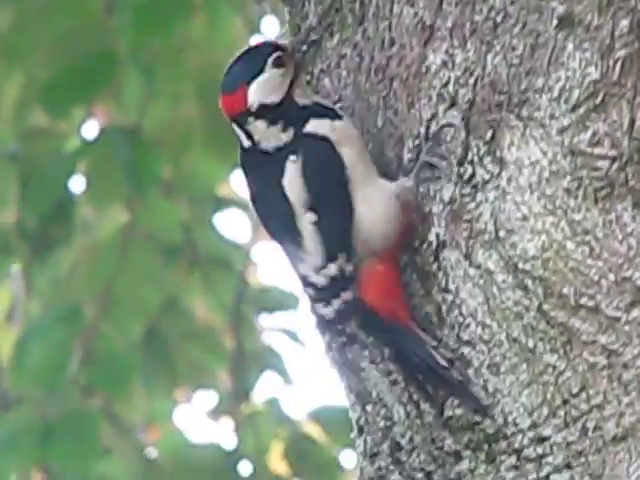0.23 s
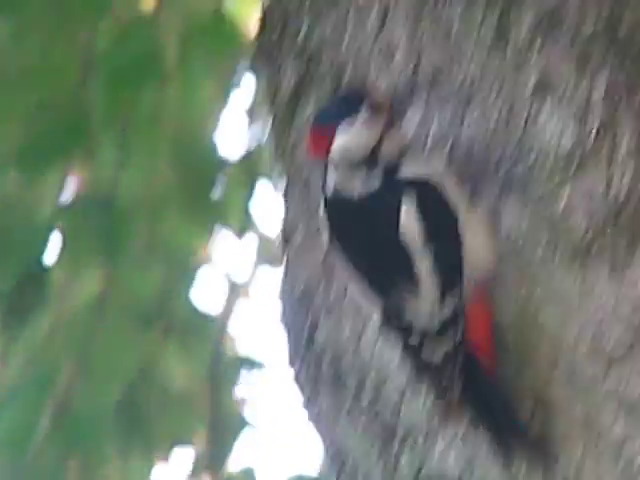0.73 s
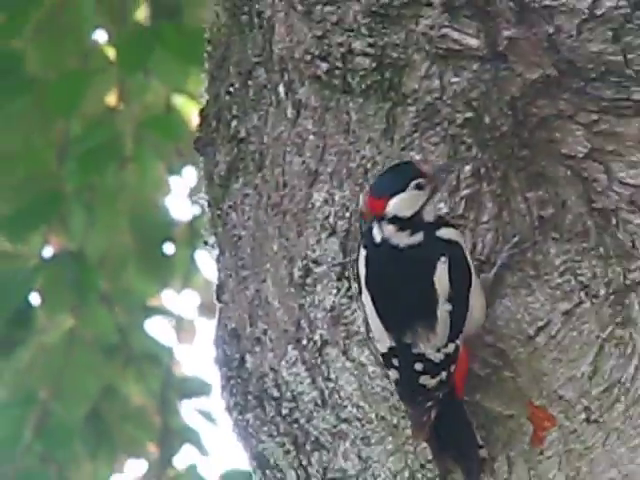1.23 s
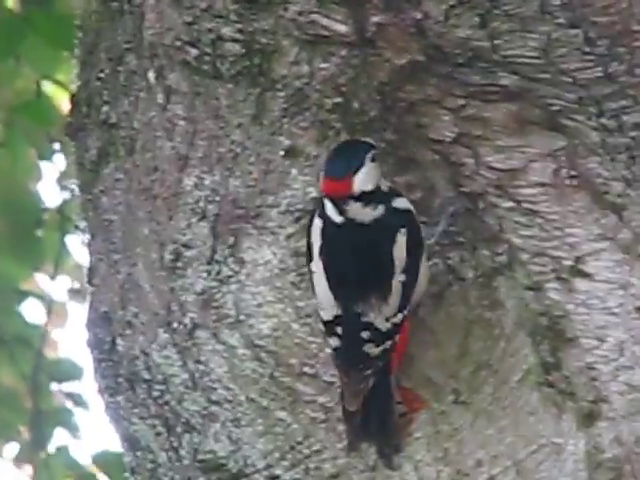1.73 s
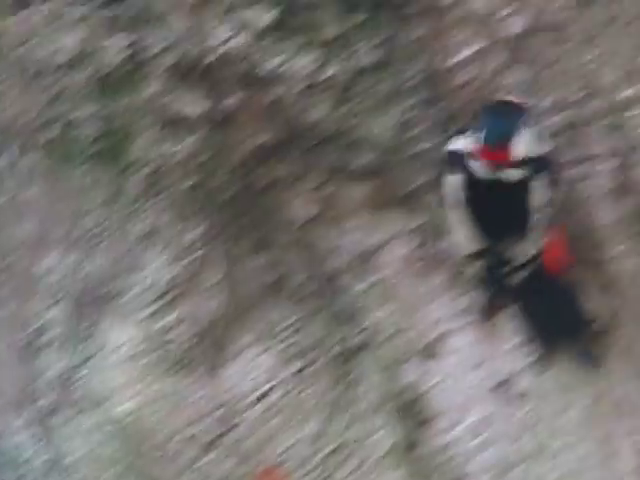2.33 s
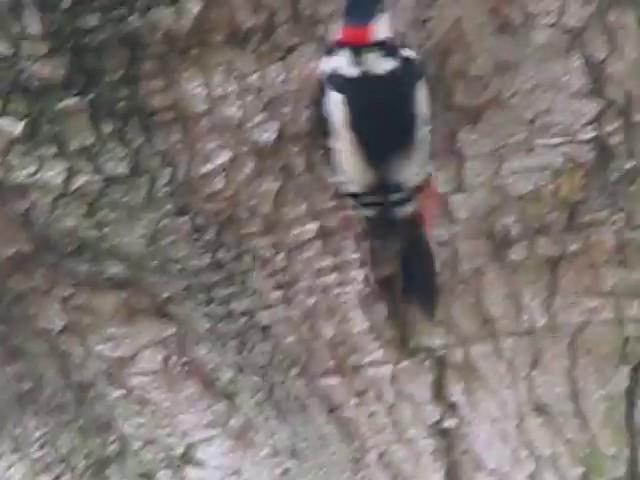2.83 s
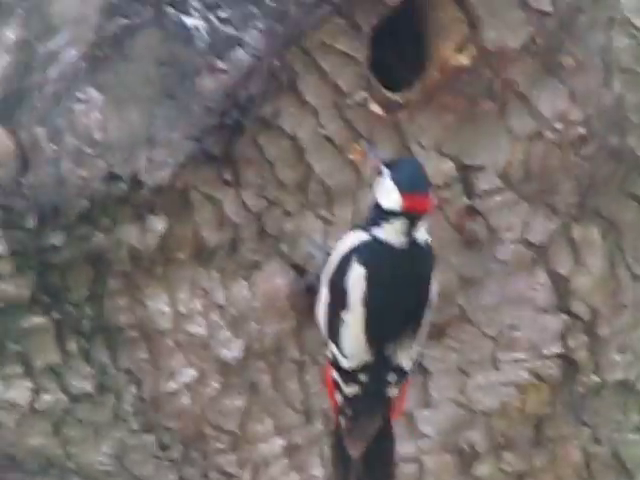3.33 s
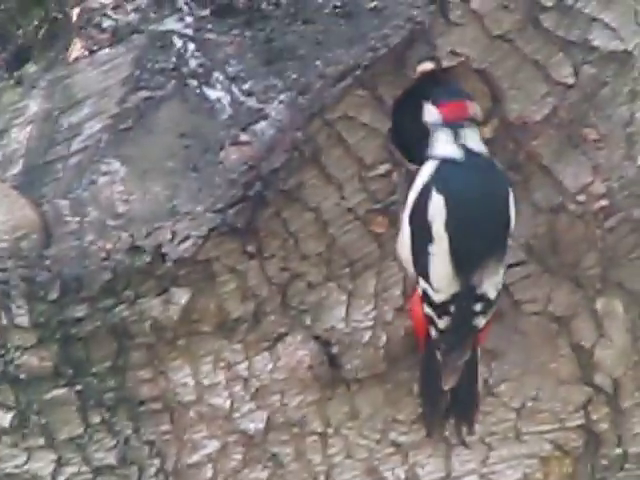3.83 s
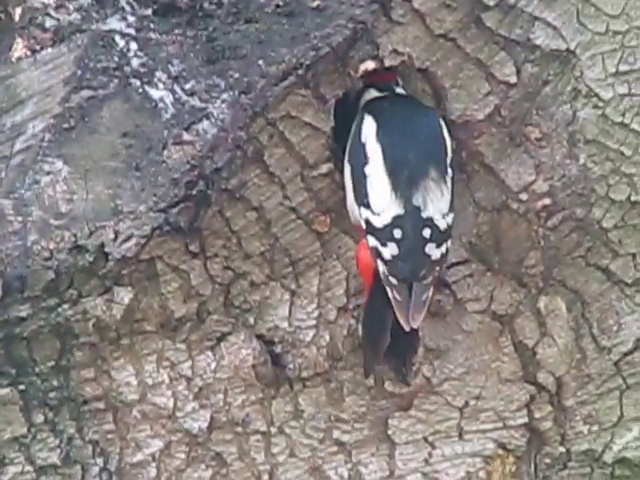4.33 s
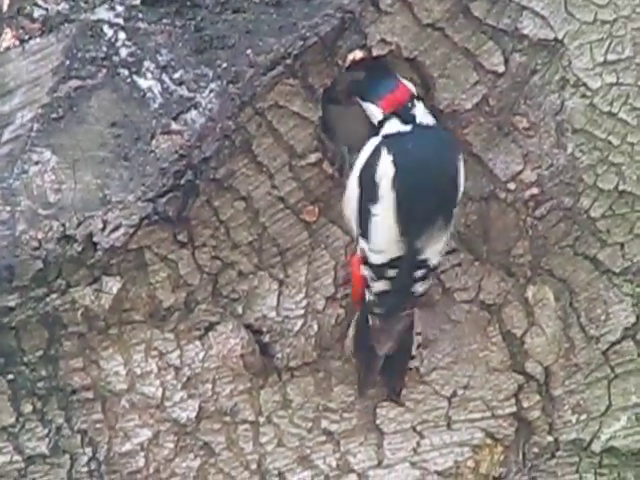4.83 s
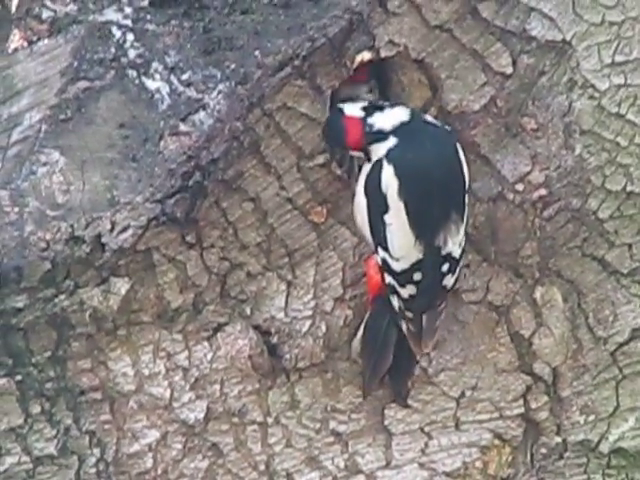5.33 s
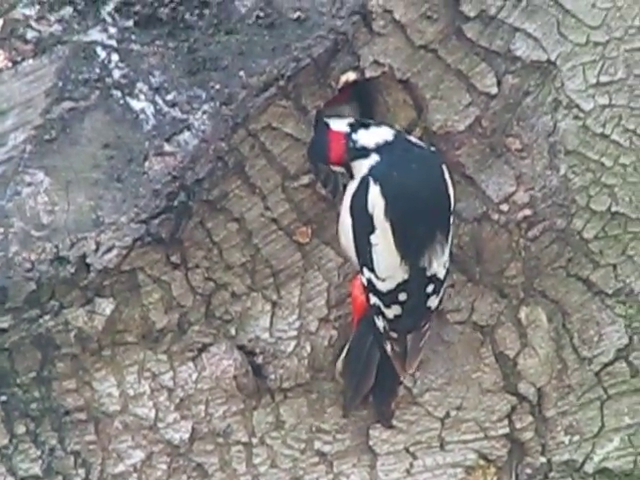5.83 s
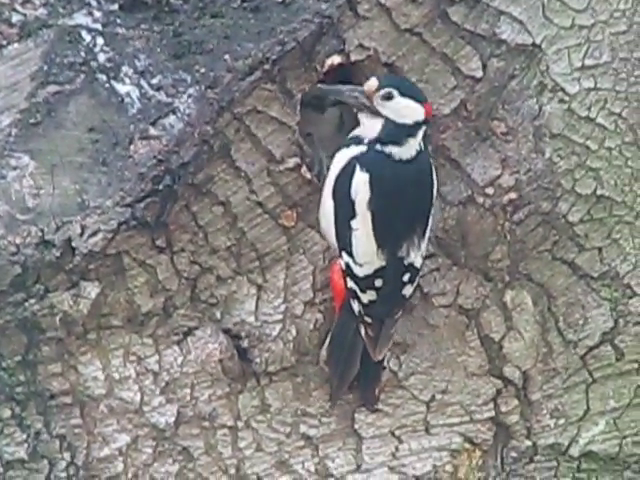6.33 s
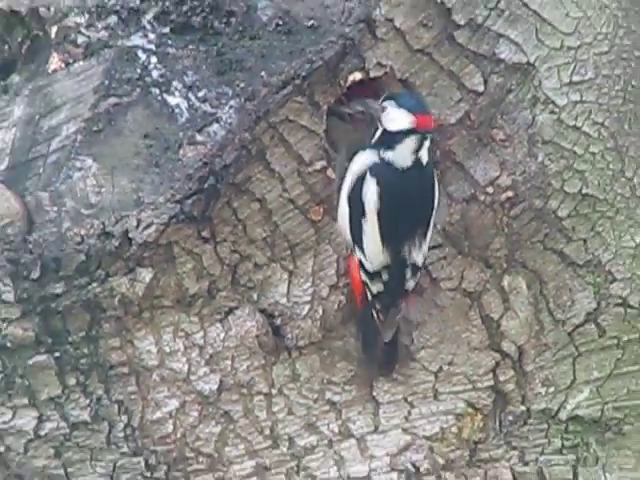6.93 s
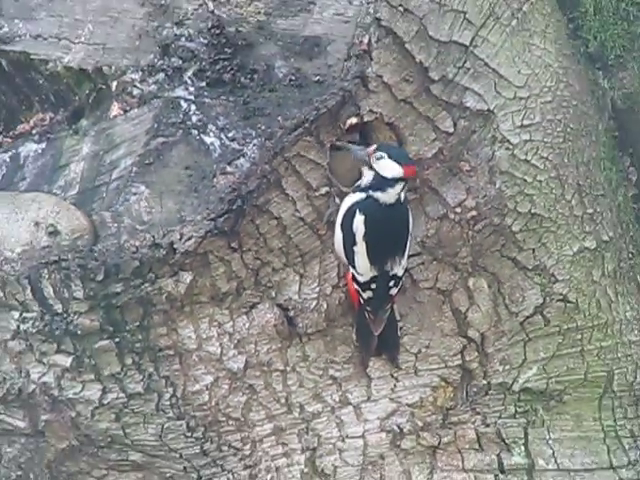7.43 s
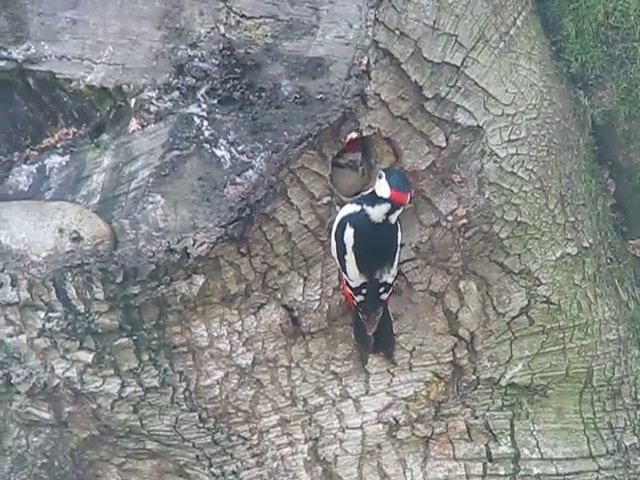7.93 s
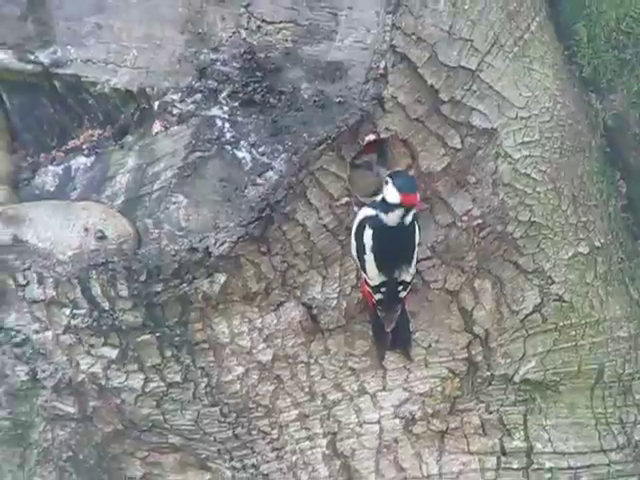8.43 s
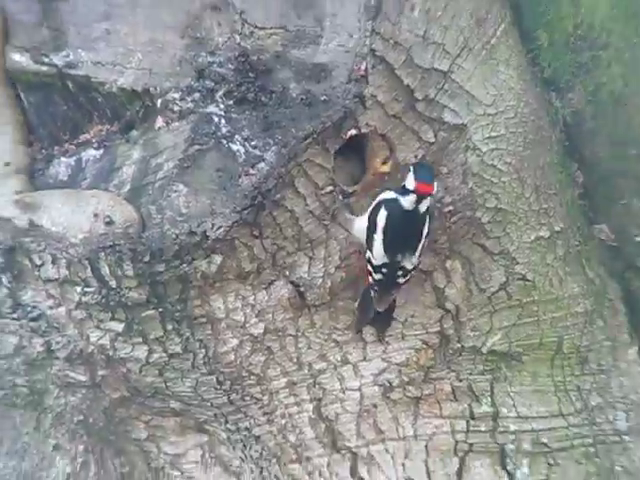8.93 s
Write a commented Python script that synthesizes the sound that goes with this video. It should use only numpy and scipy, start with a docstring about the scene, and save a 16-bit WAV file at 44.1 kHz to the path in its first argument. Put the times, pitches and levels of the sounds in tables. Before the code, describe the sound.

Outdoors among trees, soft wind and leaves lie over a faint wavering low hum. Far birds whistle first; then sharp, arched nestling calls repeat about six times a second, with one tiny tap and a distant dove. The calls slow slightly and peak, giving way to quiet chips and deeper, thinner peeping. The chatter returns, joined by a crisp knock and several softer wooden taps. The stereo microphone picks up the chicks prominently, with short echoes from bark and trunks.

```python
"""Wind rumble and leaf rustle (shaped noise), with a low drone (a wavering tone), run all the way through.
From the start small birds whistle far off (gliding pure tones), and a nestling in a tree hole begs in short
arched notes (stacked harmonics with rough ends). At 2 s come a distant dove and the first tap (crack and ring).
After 4 s short grainy noise puffs, a second nestling's peeps from deeper in the hole and, during feeding, weak
falling chips join in; the chatter returns near 6.8 s, and more taps and knocks follow from 7.8 s."""
import sys
import numpy as np
from scipy import signal
from scipy.fft import rfft, irfft, next_fast_len
from scipy.io import wavfile
from scipy.ndimage import uniform_filter1d

SR = 44100
rng = np.random.default_rng(int(sys.argv[2]) if len(sys.argv) > 2 else 0)


def dump(signal):
    """Clip the signal to [-1, 1] and save it as 16-bit WAV at the path in sys.argv[1]."""
    limited = np.clip(np.atleast_2d(signal).T, -1, 1)
    pcm = np.round(limited * 32767).astype(np.int16)
    wavfile.write(sys.argv[1], SR, pcm)


N = 404397  # length in samples


def gain_of(db):
    """Turns decibels into amplitude."""
    return 10 ** (np.asarray(db) / 20)


def evened(x):
    """Scales a sound to rms 1."""
    return x / np.sqrt(np.mean(x ** 2) + 1e-20)


def read(points, hz):
    """Reads a curve between its points; equal pitch steps are equal distances."""
    f, value = np.transpose(points)
    return np.interp(np.log(hz + 1), np.log(f + 1), value)


def add(mix, s, sound):
    """Mixes a sound in at s seconds."""
    part = mix[max(round(s * SR), 0):][:len(sound)]
    part += sound[:len(part)]


def band_noise(count, hz, width_hz):
    """Noise of rms 1 in a bell-shaped band; centred on 0 Hz it is a slow wander."""
    size = next_fast_len(count + 4096)
    bell = np.exp(-((np.fft.rfftfreq(size, 1 / SR) - hz) / width_hz) ** 2)
    noise = irfft(rfft(rng.standard_normal(size)) * bell, size)
    return evened(noise)[:count]


# balance of low and high in wind and leaves: [f/Hz, relative level/dB]
AIR_COLOUR = [(12, -36), (20, -5), (44, -0.5), (64, -2), (119, -5), (175, -7.5), (491, -17.5), (549, -17.5),
              (1450, -18), (1670, -17), (2400, -24.5), (2610, -23), (6020, -30), (7950, -34),
              (15500, -44.5)]
# the breeze; only its changes about the average count: [t/s, wind rumble level/dB, leaf rustle level/dB]
BREEZE_LEVELS = [(0, -46.5, -44.5), (.7, -45.5, -46.5), (1.2, -47.5, -45), (1.75, -49.5, -44.5),
                 (2.5, -50, -45), (3, -48.5, -46.5), (4.6, -49, -45.5), (5.5, -49, -45.5),
                 (6.3, -50, -45.5), (7.2, -53.5, -45), (8, -52.5, -44), (9.17, -54.5, -42.5)]
# how alike the air sounds at left and right: [f/Hz, likeness 0-1]
AIR_LIKENESS = [(30, 0.94), (120, 1), (250, .94), (500, 0.92), (1000, 0.62), (2000, 0.41), (5000, 0.033),
                (15000, 0.082)]
AIR_DB = -41  # overall rms


def air(patchy_db=0.82):
    """Wind rumble below and leaves above are noise that follows the breeze, in drifting patches."""
    frames, hz = N // 512 + 5, np.fft.rfftfreq(2048, 1 / SR)
    a, b, c, d, patches = rng.standard_normal((5, len(hz), frames))
    patches = uniform_filter1d(patches, size=16, axis=0)
    patches = evened(uniform_filter1d(patches, size=10, axis=1))

    t = np.arange(frames) * 512 / SR
    s, *levels = np.transpose(BREEZE_LEVELS)
    rumble_db, rustle_db = (np.interp(t, s, level - level.mean()) for level in levels)
    low = (1 / (1 + (hz / 500) ** 2))[:, None]
    gusty = low * (1 - np.exp(-(hz / 70) ** 2))[:, None]  # the deepest rumble does not follow the breeze

    same = np.clip(read(AIR_LIKENESS, hz), -1, 1)[:, None]
    left = a + 1j * b
    right = same * left + np.sqrt(1 - same ** 2) * (c + 1j * d)
    breeze_db = gusty * rumble_db + (1 - low) * rustle_db
    level_db = read(AIR_COLOUR, hz)[:, None] + breeze_db + patchy_db * patches
    z = np.array([left, right]) * gain_of(level_db)
    sound = signal.istft(z, nperseg=2048, noverlap=1536)[1][:, :N]
    return gain_of(AIR_DB) * evened(sound)


# the drone swells and sinks: [t/s, level before trim and flutter/dB]
DRONE_LEVELS = [(0, -49.5), (.95, -39.5), (1.3, -59), (1.85, -44), (2.05, -52), (3.3, -44.5), (3.701, -40),
                (4.4, -44.5), (4.85, -43.5), (5.2, -44), (5.65, -47.5), (6.4, -46), (6.77, -54),
                (7.02, -40), (7.41, -58), (7.64, -40.5), (8.66, -52), (9.17, -51)]


def drone(hz=69.3, wander_hz=2.205, trim_db=-1.5, flutter_db=2):
    """A low far-off tone whose pitch and loudness waver."""
    level_db = np.interp(np.arange(N) / SR, *np.transpose(DRONE_LEVELS))
    level_db += trim_db + flutter_db * band_noise(N, 0, 8.7)
    wavering_hz = hz + wander_hz * band_noise(N, 0, 5.39)
    tone = np.sin(2 * np.pi * np.cumsum(wavering_hz) / SR)
    return gain_of(level_db) * evened(tone)


# distant songbirds: [t/s, length/s, start f/Hz, end f/Hz, level before the mix/dB, trill size before scaling/Hz]
SONGBIRDS = [(0, 0.38, 2190, 2070, -56.5, 20), (.38, 0.24, 2118, 2040, -55, 32),
             (0.96, 0.066, 3300, 3770, -52, 25), (1.06, .2, 2980, 2835, -54, 40),
             (1.18, 0.086, 2380, 2080, -53, 20), (1.28, .06, 4520, 4870, -54, 73),
             (1.33, 0.26, 2066, 2037, -55, 48), (1.41, 0.079, 5200, 4890, -46.5, 200),
             (1.51, 0.099, 4400, 4300, -48, 280), (1.55, 0.04, 6000, 6400, -55, 220),
             (2.58, .18, 3210, 3060, -51.5, 470), (6.7, 0.13, 8200, 8460, -54, 300),
             (7.17, 0.38, 3950, 3904, -48.5, 570), (7.8, 0.14, 7220, 7000, -43.5, 320),
             (7.94, 0.24, 7000, 6040, -50.5, 590), (8.08, 0.079, 5860, 5550, -43, 880),
             (8.2, 0.039, 5040, 4680, -46, 60), (8.29, 0.099, 5900, 5480, -43, 600)]
# a dove far away: [t/s, length/s, start f/Hz, end f/Hz, level before the mix/dB, trill size before scaling/Hz]
FAR_DOVE = [(2.029, 0.26, 481, 452, -57, 3.6), (2.22, 0.27, 425, 406, -57, 3), (3.35, .2, 454, 436, -60, 3),
            (3.679, 0.14, 428.4, 415, -52, 3)]


def whistles(rows, trill_hz=70):
    """Each bird note is one pure tone gliding in pitch, with a fast uneven trill."""
    out = np.zeros(N)
    for s, length, start_hz, end_hz, db, depth_hz in rows:
        count = round(length * SR)
        trill = 0.61 * depth_hz * band_noise(count, trill_hz, 40.9)
        hz = np.linspace(start_hz, end_hz, count) + trill
        tone = np.sin(2 * np.pi * np.cumsum(hz) / SR)
        add(out, s, gain_of(db) * evened(tone * signal.windows.tukey(count, .5)))
    return out


# loudness through one note: [share of its length 0-1, level/dB]
NOTE_SWELL = [(0, -5), (.1, -4.5), (.25, 1.5), (.5, 0), (.7, -2.5), (.85, -7.5), (1, -9)]
# resonance of the nestling's throat: [f/Hz, level/dB]
THROAT_COLOUR = [(1200, 0.5), (2400, 2), (3500, 1), (5000, -0.5), (6400, 6), (7200, 9.5), (7700, 7.5),
                 (8500, -3.5), (12500, -9.5), (16000, -13.5)]
# pitch bends as shares of the pitch: a leap at the start (dying away in LEAP_S seconds), an arch, a final drop
LEAP, LEAP_S, ARCH, DROP, DROP_POWER = 0.2924, 0.004046, .6, 0.215, 8.15
# unsteadiness: pitch jitter at the crest (share of the pitch), level flutter of each harmonic (dB)
CREST_JITTER, FLUTTER_DB = .0025, 1.1


def note(length, crest, top_hz, harmonics_db, push_db, edge_jitter=0.042, rasp_db=-24, fade=0.056,
         dull_db=2, slack_sag=0.32, doubling=0.37):
    """One arched note: it leaps up, is cleanest at its crest, and is rough where the voice catches and lets go."""
    u = np.linspace(0, 1, round(length * SR))  # place in the note
    leap = LEAP * np.exp(-u * length / LEAP_S)
    sag = leap + ARCH * (u - crest) ** 2 + DROP * u ** DROP_POWER
    loose = sag / slack_sag  # slack membranes vibrate unevenly
    jitter = (CREST_JITTER + edge_jitter * loose) * band_noise(len(u), 0, 960)
    hz = top_hz * (1 - sag) * (1 + jitter)
    phase = 2 * np.pi * np.cumsum(hz) / SR

    voice = np.zeros(len(u))
    for k, db in enumerate(harmonics_db, 1):
        # each harmonic slides over the throat's resonance
        colour_db = read(THROAT_COLOUR, k * hz) - read(THROAT_COLOUR, k * top_hz)
        colour_db -= dull_db * loose * (k - 2)  # a slack voice loses its high harmonics first
        level = gain_of(db + colour_db + FLUTTER_DB * band_noise(len(u), 0, 67))
        voice += np.sqrt(2) * level * np.sin(k * phase) * (k * hz < SR / 2)
    voice *= 1 + doubling * loose * np.cos(phase / 2)  # at the slack ends strong and weak cycles alternate

    rasp = gain_of(rasp_db) * voice.std() * (.5 + 4 * loose) * band_noise(len(u), 4400, 4700)
    swell_db = np.interp(u, *np.transpose(NOTE_SWELL)) + push_db * (u - .45)
    return (voice + rasp) * gain_of(swell_db) * signal.windows.tukey(len(u), fade)


def onset_puff(db, length=0.018, centre_hz=5000, width_hz=5200):
    """A short soft-edged puff of broad noise around the note's onset."""
    count = round(length * SR)
    return gain_of(db) * signal.windows.hann(count) * band_noise(count, centre_hz, width_hz)


# the chatter, one row a note: [t/s, length/s, f/Hz, place of the crest 0-1, effort as a level/dB]
CHATTER_NOTES = [(0.067, 0.04, 2164, 0.35, -44.5), (0.264, 0.042, 2188, 0.28, -44.5),
                 (0.415, 0.041, 2190, 0.28, -45), (1.606, .055, 2353, .37, -35),
                 (1.751, 0.06, 2468, 0.37, -29), (1.9144, 0.058, 2298, 0.33, -35.5),
                 (2.075, 0.05, 2468, 0.45, -28.5), (2.211, 0.072, 2547, .43, -27.5),
                 (2.3947, 0.062, 2467, 0.33, -31.5), (2.571, 0.064, 2338, 0.31, -36.5),
                 (2.738, 0.059, 2327, 0.33, -37), (2.8994, 0.06, 2408, 0.29, -35),
                 (3.08, 0.067, 2378, .28, -36.5), (3.249, 0.065, 2336, 0.24, -41.5),
                 (3.417, 0.068, 2342, 0.27, -39), (3.591, 0.048, 2564, 0.33, -34),
                 (3.72, .082, 2680, 0.35, -41), (3.915, 0.077, 2570, 0.4, -42),
                 (4.123, .065, 2527, .49, -44), (4.3228, .0665, 2655, .5, -43),
                 (4.521, 0.07, 2710, 0.41, -37.5), (4.739, 0.059, 2605, 0.43, -28.5),
                 (4.993, 0.059, 2393, 0.48, -22), (5.2463, 0.044, 2580, 0.47, -28.5),
                 (6.79, 0.031, 2395, 0.35, -35.5), (6.951, .055, 2403, .43, -26),
                 (7.143, 0.053, 2183, 0.42, -39), (7.313, 0.054, 2140, 0.2, -45.5),
                 (7.48, 0.045, 2300, .5, -35), (7.641, 0.045, 2350, 0.48, -29),
                 (7.815, 0.055, 2167, 0.37, -37.5), (7.976, .0503, 2192, .46, -38),
                 (8.137, 0.056, 2491, 0.46, -25.5), (8.354, 0.051, 2322, 0.47, -32),
                 (8.535, 0.057, 2290, 0.38, -34.5), (8.718, 0.058, 2184, 0.44, -45.5),
                 (8.883, 0.055, 2400, .47, -34), (9.057, 0.049, 2397, 0.45, -33)]
# harmonics 1 to 4 before the colour drift: [level in an ordinary note/dB, dB gained per dB of effort]
VOICE_HARMONICS = [(-44.5, 0.4), (-38.5, 0.48), (-33.5, 1), (-47, 0.73)]
ORDINARY_DB = -35  # effort of an ordinary note
# the colour drifts: [t/s, added level/dB of the fundamental, of the second harmonic, of the fourth and up]
COLOUR_DRIFT = [(0.4, -2, 0.5, -5), (1.65, -0.5, -1, -2), (2.4, -0.5, 3, 1.5), (3.4, 0.5, 2.5, -2.5),
                (3.85, -1.5, 1, 7.5), (4.35, 1, 4.5, 4.5), (4.74, 7, 9.5, -4), (5.0, 0.5, -1.5, -4),
                (5.25, -1, 0, -7), (6.949, 2.5, -2.5, 3.5), (7.6, -1, -5.5, -0.5), (8.3, 0.5, -3.5, 3),
                (8.9, 0.5, -2.5, -2)]
# a late crest makes a note swell, an early one makes it fade: dB per unit of crest, and the even crest
PUSH_DB, EVEN_CREST = 70, 0.38


def nestling(puff_db=-3, puff_lead_s=.011):
    """Chatter at the mouth of the hole; effort favours the third harmonic, so loud notes are purer."""
    out = np.zeros(N)
    ordinary_db, growth = np.transpose(VOICE_HARMONICS)
    times, *drifts = np.transpose(COLOUR_DRIFT)
    for s, length, hz, crest, db in CHATTER_NOTES:
        first, second, third, fourth = ordinary_db + growth * (db - ORDINARY_DB)
        first_db, second_db, upper_db = (np.interp(s, times, drift) for drift in drifts)
        # harmonics 4 to 8 follow the throat
        slope_db = read(THROAT_COLOUR, hz * np.arange(4, 9)) - read(THROAT_COLOUR, hz * 4)
        harmonics_db = np.r_[first + first_db, second + second_db, third, fourth + upper_db + slope_db]
        add(out, s, note(length, crest, hz, harmonics_db, PUSH_DB * (crest - EVEN_CREST)))
        add(out, s - puff_lead_s, onset_puff(fourth + upper_db + puff_db))
    return out


# taps and knocks; a t60 is the time to fade by 60 dB:
# [t/s, crack level/dB, crack centre f/Hz, crack t60/s, ring f/Hz, ring level/dB, ring t60/s]
TAPS_AND_KNOCKS = [(2.034, -31, 7000, 0.012, 6700, -34.5, 0.0087),
                   (7.8517, -33, 2470, 0.02, 1050, -37.5, 0.069),
                   (7.856, -21, 3430, 0.011, 2380, -25, 0.03), (8.155, -33.5, 1410, 0.044, 603, -30, 0.031),
                   (8.298, -34.5, 2450, .035, 878, -32.5, 0.075), (8.616, -42, 2500, 0.048, 2500, -47, .04),
                   (8.799, -43, 1510, 0.043, 1114, -43, 0.094)]


def taps():
    """Each tap is a short crack of noise and one woody ring, both dying away."""
    out, t = np.zeros(N), np.arange(SR // 8) / SR
    for s, crack_db, crack_hz, crack_t60, ring_hz, ring_db, ring_t60 in TAPS_AND_KNOCKS:
        crack = gain_of(crack_db - 60 * t / crack_t60) * band_noise(len(t), crack_hz, crack_hz * 0.54)
        ring = gain_of(ring_db - 60 * t / ring_t60) * np.sin(2 * np.pi * ring_hz * t)
        add(out, s, crack + ring)
    return out


# noise puffs before and after loud notes: [t/s, length/s, level before fades and mix/dB]
PUFFS = [(4.489, 0.035, -45.5), (4.705, 0.067, -36.5), (4.77, 0.1, -43), (5.01, 0.13, -47.5)]
GRAIN_DB = 1.2  # unevenness of the noise


def noise_puffs(centre_hz=5900, width_hz=2000):
    """Short grainy puffs of noise, before loud notes and as a broad noisy tail after them."""
    out = np.zeros(N)
    for s, length, db in PUFFS:
        count = round(length * SR)
        grain = gain_of(GRAIN_DB * band_noise(count, 0, 300)) * signal.windows.hann(count)
        add(out, s, gain_of(db) * grain * band_noise(count, centre_hz, width_hz))
    return out


# bouts of peeping by the second nestling: [start t/s, end t/s]
BOUTS = [(5.186, 5.45), (5.716, 7.51), (8.192, 8.27), (8.504, 9.11)]
# its voice: [t/s, f/Hz, third harmonic level before swell and mix/dB]
SIBLING_VOICE = [(5.19, 2760, -57), (5.36, 2440, -53), (5.75, 2490, -51.5), (6.72, 2560, -43),
                 (6.9, 2470, -52), (7.42, 2430, -55), (8.2, 2460, -42.5), (8.5, 2530, -52),
                 (9.02, 2380, -50)]
PEEP_EVERY_S, PEEP_S = .1706, .053  # beat and length


def sibling(first_db=-14, second_db=-15, fourth_db=-17, fifth_db=-23, crest=.44):
    """Thin peeps from deep in the hole, evenly spaced in each bout, nearly all third harmonic."""
    out = np.zeros(N)
    colour_db = np.array([first_db, second_db, 0, fourth_db, fifth_db])
    times, hz, db = np.transpose(SIBLING_VOICE)
    for start, end in BOUTS:
        for s in np.arange(start, end, PEEP_EVERY_S):
            harmonics_db = np.interp(s, times, db) + colour_db
            add(out, s, note(PEEP_S, crest, np.interp(s, times, hz), harmonics_db, push_db=-1))
    return out


# short, weak, falling chips while the nestling is fed: [t/s, length/s, f/Hz, level before colour and mix/dB]
FEEDING_CHIPS = [(5.532, 0.029, 2600, -43.5), (5.688, .036, 2600, -48.5), (5.956, 0.037, 2066, -60),
                 (6.237, .03, 2100, -57.5), (6.476, .03, 1974, -46), (6.627, 0.023, 1850, -48)]
# colour of their harmonics: [f/Hz, added level/dB]
CHIP_HARMONICS = [(1800, 3.5), (2500, 2.5), (4500, 2.5), (7500, 1), (10000, -3.5), (16000, -10)]


def chips(crest=.2, push_db=10):
    """Very short notes that fall almost from the start, their lower harmonics about equally strong."""
    out = np.zeros(N)
    for s, length, hz, db in FEEDING_CHIPS:
        harmonics_db = db + read(CHIP_HARMONICS, hz * np.arange(1, 9))
        add(out, s, note(length, crest, hz, harmonics_db, push_db))
    return out


# echoes off bark and branches, and a late one off another trunk: [delay/s, left level/dB, right level/dB]
BARK_ECHOES = [(.0013, -15, -33), (.0031, -41, -6.5), (.0062, -15, -44), (0.0095, -44, -14.5),
               (.05, -27, -26)]
# the near chatter has a different balance of pitches at left and right: [f/Hz, left minus right level/dB]
LEFT_RIGHT_LEAN = [(1500, 5), (2400, -3.5), (4800, 0.5), (6600, -1.5), (7300, -3.5), (8200, 4), (9500, 7),
                   (11000, 2.5), (13000, 0), (16000, -1)]


def from_hole(x):
    """Adds single echoes to the straight path; these make a comb of peaks, so gliding notes ripple."""
    size = next_fast_len(N + SR // 10)
    hz = np.fft.rfftfreq(size, 1 / SR)
    paths = 1
    for delay, left, right in BARK_ECHOES:
        paths = paths + gain_of([[left], [right]]) * np.exp(-2j * np.pi * hz * delay)
    sides = gain_of(np.array([[.5], [-.5]]) * read(LEFT_RIGHT_LEAN, hz))
    return irfft(rfft(x, size) * paths * sides, size)[:, :N]


# how long the echo of the trees takes to fade by 60 dB: [f/Hz, t60/s]
WOOD_ECHO = [(300, 0.097), (2500, 1), (7000, 0.64), (10000, 1), (15000, 0.074)]


def trees(x, build_s=0.0028):
    """Trunks and leaves scatter a sound into a fading tail of noise, different at each ear."""
    hz, t, z = signal.stft(rng.standard_normal((2, SR)), SR, nperseg=256)
    fading = gain_of(-60 * t / read(WOOD_ECHO, hz)[:, None])
    z = z * fading * (1 - np.exp(-t / build_s))
    tail = signal.istft(z, SR, nperseg=256)[1]
    return signal.fftconvolve(x[None], tail / np.linalg.norm(tail[0]), axes=1)[:, :N]


def scene(chatter_db=-.5, chatter_wet_db=-15.5, song_wet_db=-2, song_dry_db=-6, taps_wet_db=-19):
    """Mixes near nestlings and taps, far birds that are mostly echo (wet), the air and the drone."""
    chatter = gain_of(chatter_db) * (nestling() + chips() + sibling() + noise_puffs())
    far, knocks = whistles(SONGBIRDS + FAR_DOVE), taps()
    direct = from_hole(chatter) + gain_of(song_dry_db) * far + knocks
    to_trees = gain_of(chatter_wet_db) * chatter + gain_of(song_wet_db) * far + gain_of(taps_wet_db) * knocks
    return direct + trees(to_trees) + air() + drone()


EDGE_HZ = 15950  # top of the band that is kept


def record(dry):
    """Cuts off the highest treble with a steep low-pass filter."""
    low_pass = signal.firwin(511, EDGE_HZ, window=("kaiser", 9), fs=SR)
    return signal.oaconvolve(dry, low_pass[None], "same")


dry = scene()
out = record(dry)
dump(out)
```